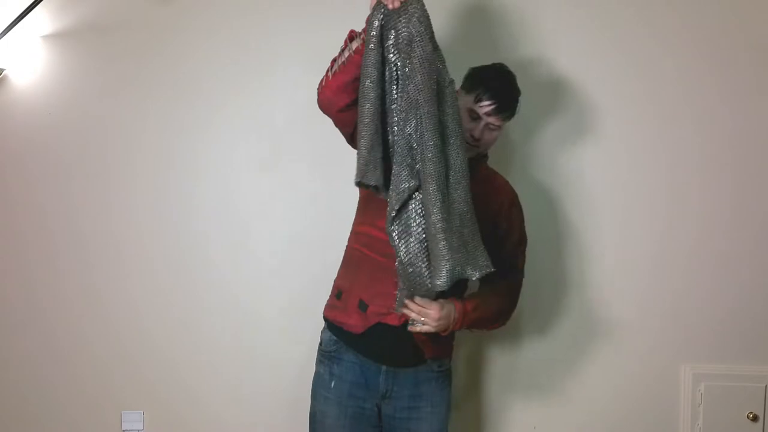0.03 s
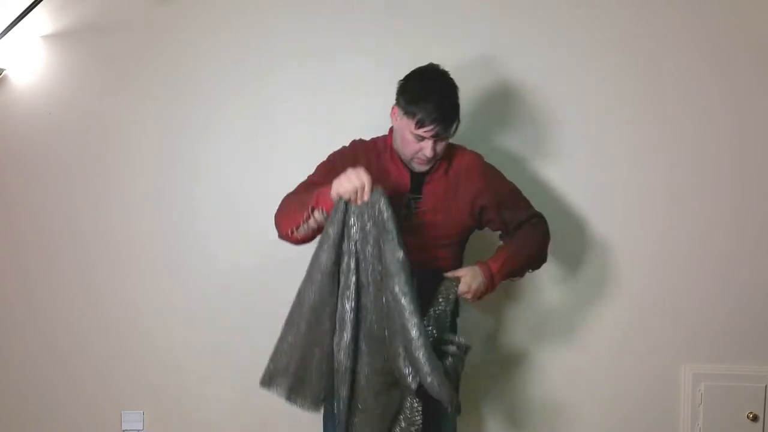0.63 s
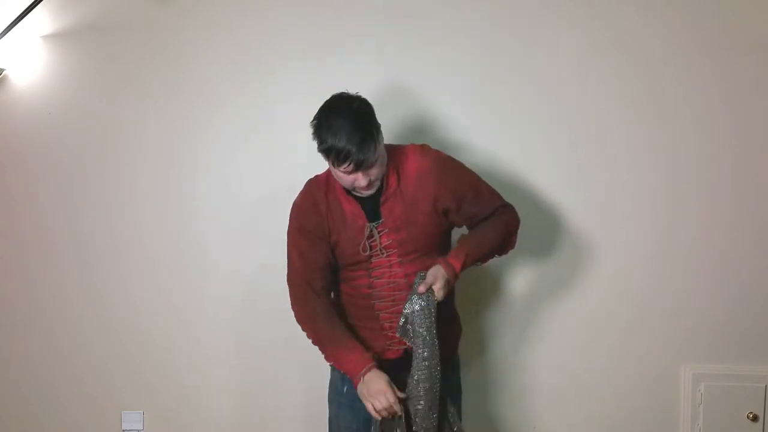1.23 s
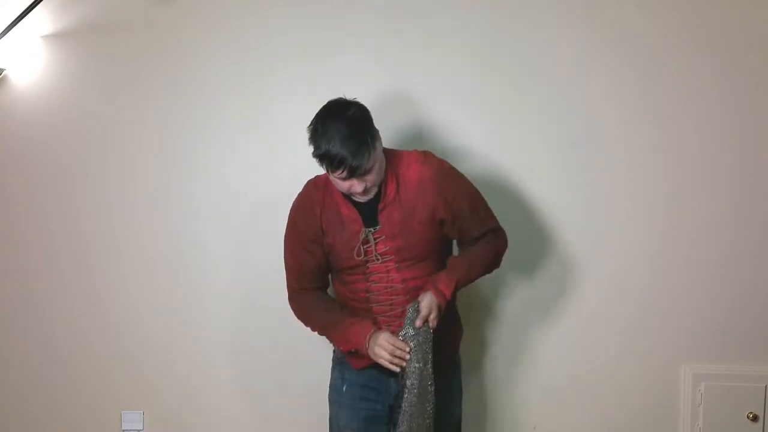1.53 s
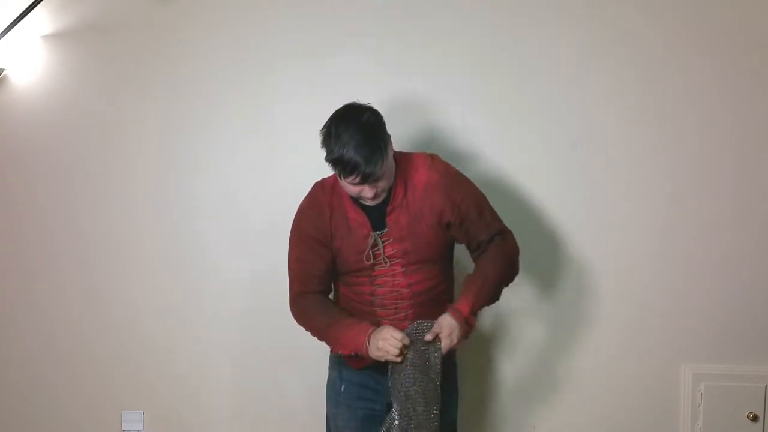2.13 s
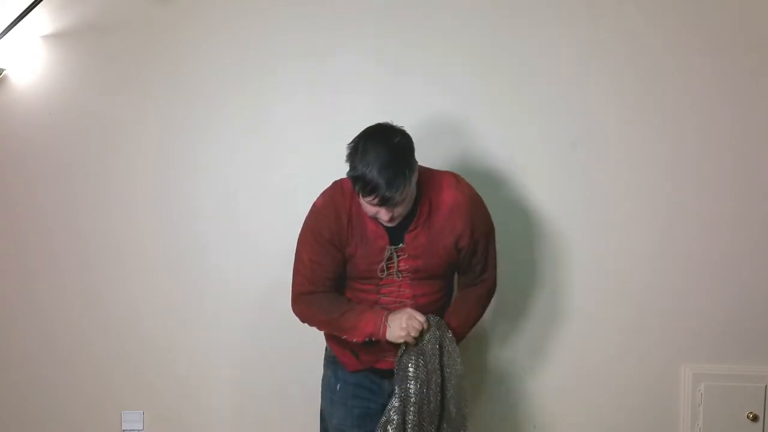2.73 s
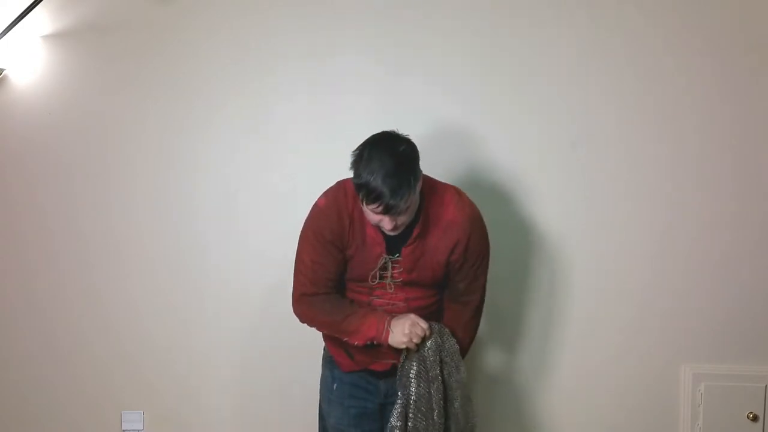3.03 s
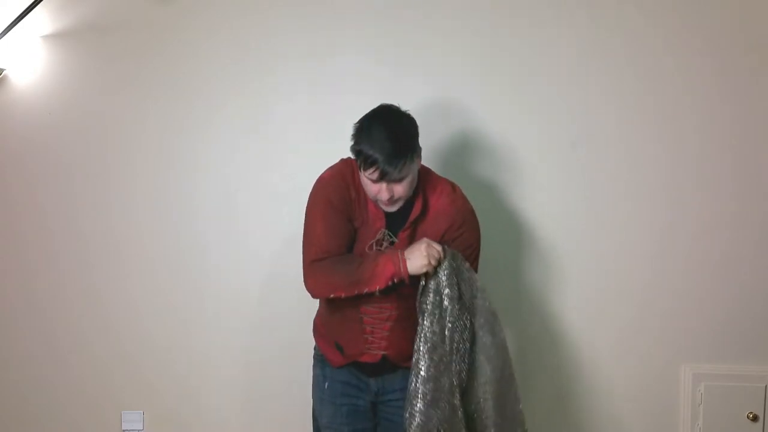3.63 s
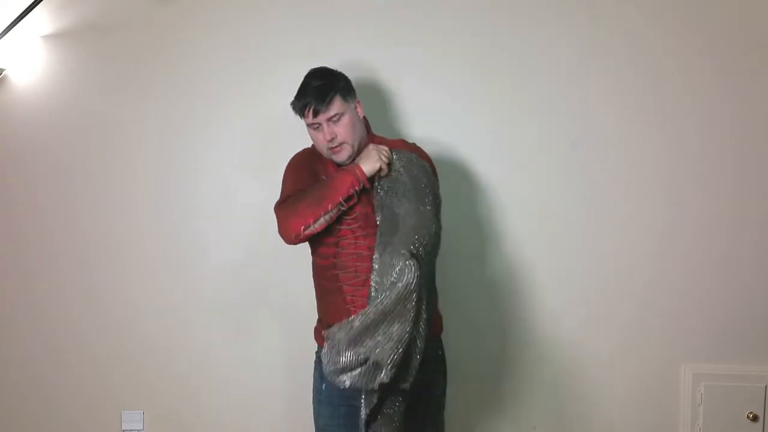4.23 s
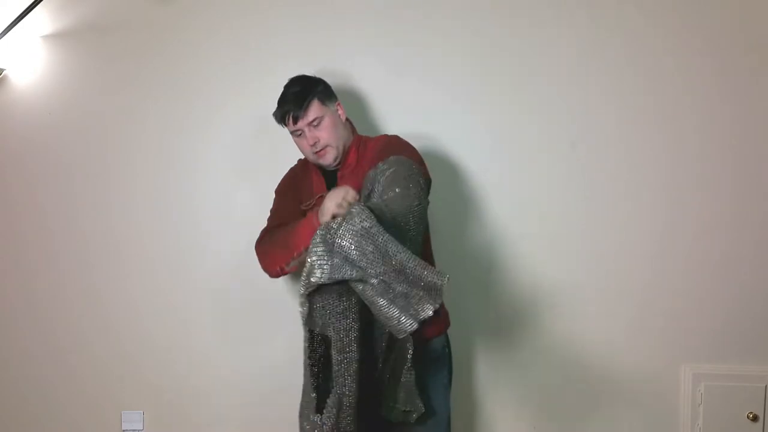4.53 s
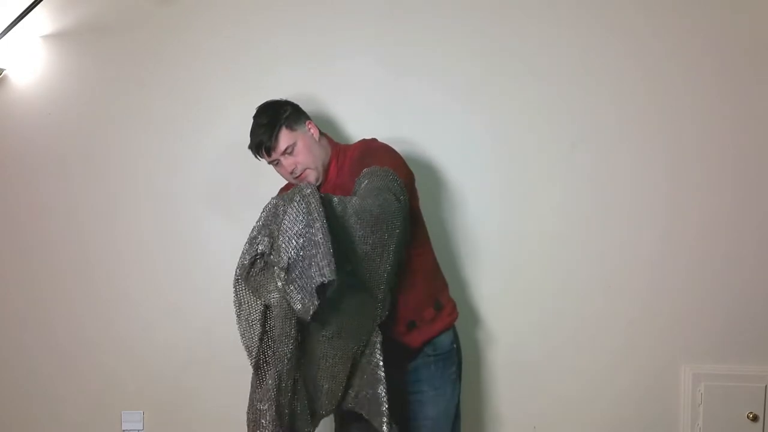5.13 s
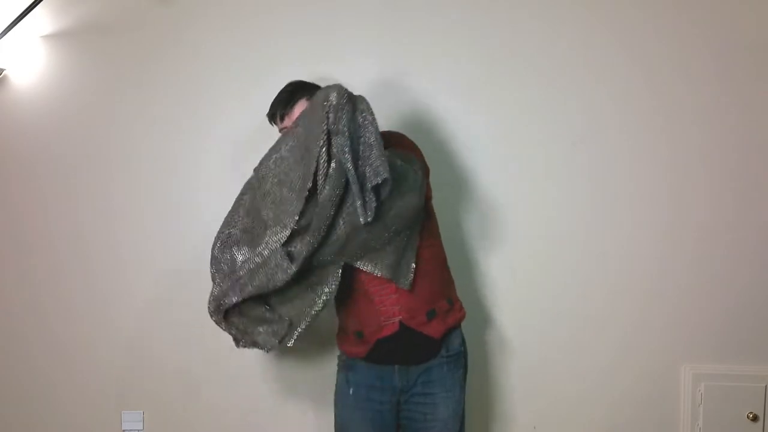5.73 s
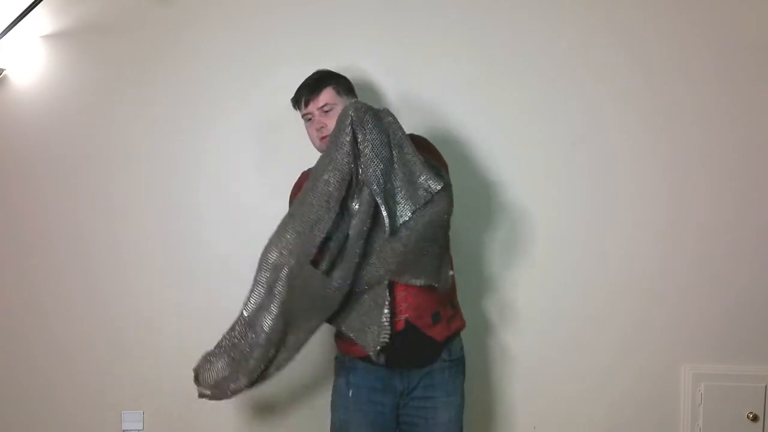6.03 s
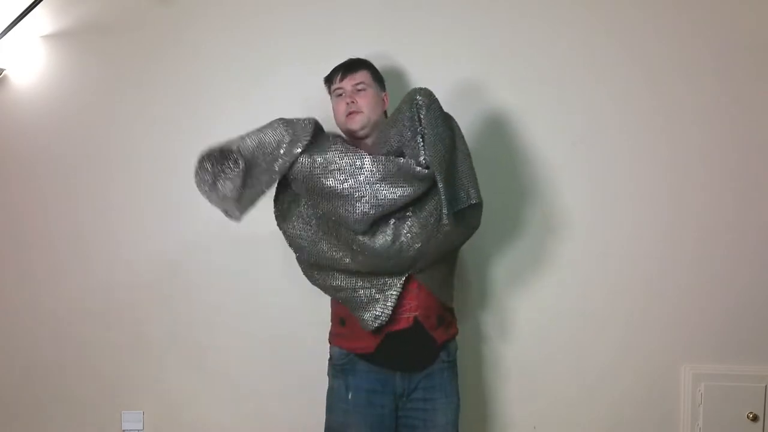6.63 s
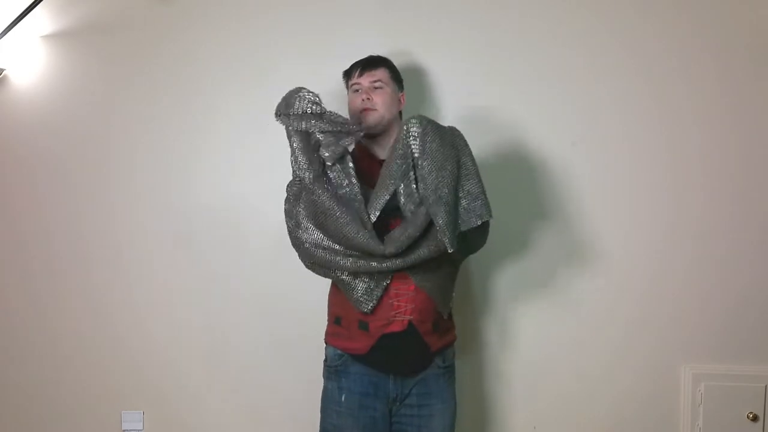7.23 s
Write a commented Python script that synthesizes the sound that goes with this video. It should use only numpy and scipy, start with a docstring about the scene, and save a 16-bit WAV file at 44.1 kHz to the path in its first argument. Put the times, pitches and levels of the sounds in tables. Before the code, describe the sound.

A chain mail shirt is handled in a quiet room, its small steel rings jingling and scraping in bright, uneven surges. Early on, the hem knocks once on the floor. Cloth sleeves rub on the metal and folds tick over through a quieter stretch. Then the jingling returns and grows busier as the shirt is pulled over the arms. The walls add a short echo above a faint rumble and hiss.

```python
"""A chain mail shirt is lowered, gathered and pulled over the arms in a quiet room.
Thousands of small steel rings tick against each other as the weave moves, and scrape where they
carry weight. Once, the hem drops on the floor with a knock. Sleeves rub on the rings and folds snap
over under the fingers. The walls add a short echo, and the room rumbles and hisses faintly."""
import sys
import numpy as np
from scipy import signal
from scipy.fft import rfft, irfft, next_fast_len
from scipy.io import wavfile
from scipy.ndimage import uniform_filter1d

SR = 44100
rng = np.random.default_rng(int(sys.argv[2]) if len(sys.argv) > 2 else 0)


def waveform_to_disk(signal):
    """Save audio, clipped to [-1, 1], as 16-bit WAV at the path in sys.argv[1]."""
    frames = np.transpose(np.atleast_2d(signal))
    scaled = np.clip(frames, -1, 1) * 32767
    samples = np.round(scaled).astype(np.int16)
    wavfile.write(sys.argv[1], SR, samples)


N = 321489
T = np.arange(N) / SR

# Tone curves: how strong each sound is from low to high. Columns: pitch_hz, gain_db
RUMBLE_TONE = [(10, -9), (21, 6.5), (30, -1), (42, -6), (58, -4), (80, -4.5), (105, -3), (150, -8),
               (190, -7.5), (330, -15), (470, -17.5), (650, -23), (1200, -29.5), (2500, -51.5)]
HISS_TONE = [(700, -12), (1300, 1), (1600, 4.5), (2300, -1.5), (5000, -3), (9000, -2), (15500, -10.5)]
JINGLE_TONE = [(1500, -45), (3000, -17), (4500, -7.5), (6000, -7), (7200, -2.5), (8300, -1.5), (10500, -3),
               (13000, -5), (15800, -6)]
SCRAPE_TONE = [(250, -2.5), (600, -4.5), (1200, -5.5), (2400, -2), (3600, 0.5), (5200, 0), (7000, -2.5),
               (11000, -5), (16000, -30)]
HEAP_TONE = [(90, -27), (190, -0.5), (300, 3), (400, 3), (620, -4), (800, -2.5), (1000, 0), (1350, -9),
             (1900, -5.5), (3000, -24), (7000, -28)]
CLOTH_TONE = [(150, -4), (500, 1.5), (800, -3), (1200, -4), (1800, -7), (2800, -11), (6000, -19),
              (14000, -28)]
SNAP_TONE = [(200, -14), (550, 4), (1100, 0), (2200, -1), (4500, -11.5), (8000, -3), (15000, -9)]
# The steady notes of the room's drone. Columns: pitch_hz, width_hz, level_db
DRONE_NOTES = [(68.6, 4.3, -63.5), (267.5, 24, -62.5), (769, 31, -70.5)]
# Each shift of the weave. Columns: fullest_s, level_db, rise_s, settle_s, scrape_offset_db
WEAVE_SHIFTS = [ (.059, -52, 0.096, 0.089, -20), (.209, -49, .045, .06, -19), (.39, -59, .05, .15, -15),
                (.668, -43.5, 0.044, .11, -11.5), (.872, -44, 0.039, 0.11, -11),
                (1.016, -47.5, 0.042, .2, -10.5), (1.33, -51.5, 0.15, 0.2, -11.5),
                (1.46, -46.5, 0.085, 0.15, -15), (1.533, -39, 0.028, 0.031, -2.5),
                (1.582, -36.5, 0.031, 0.043, -7), (1.75, -53, 0.055, 0.12, -15),
                (1.93, -51.5, 0.059, 0.17, -10.5), (2.1, -51, 0.057, 0.086, -4.5),
                (2.27, -55.5, .03, 0.17, -7), (2.482, -47, 0.071, 0.14, -9.5),
                (2.745, -58, .04, 0.091, -16), (2.9, -50, 0.059, 0.092, -16), (3.46, -73, .13, .35, 8),
                (3.724, -61, .015, 0.062, 8.5), (3.794, -64, 0.025, 0.13, 6), (4.032, -52, 0.15, 0.24, -10),
                (4.175, -47, 0.077, 0.33, -10), (4.345, -47, .025, 0.16, -12),
                (4.537, -44, 0.052, 0.15, -12), (4.663, -44.5, 0.045, 0.075, -11.5),
                (4.806, -46.5, 0.047, .06, -14), (5.038, -54, 0.017, .04, -15),
                (5.166, -50, .021, 0.074, -7), (5.25, -52.5, .035, 0.21, -3.5),
                (5.487, -50, 0.067, 0.33, -4.5), (5.638, -43, 0.022, 0.046, -6),
                (5.8, -40.5, 0.042, .09, -10), (5.897, -39, 0.032, 0.12, -9),
                (5.958, -38.5, 0.023, 0.035, -14), (6.073, -45, .08, 0.074, -8.5),
                (6.155, -48.5, 0.044, 0.044, -9), (6.333, -42.5, 0.024, 0.022, -10.5),
                (6.57, -53, 0.12, 0.13, -0.5), (6.662, -39, 0.049, 0.093, -8.5),
                (6.765, -39.5, 0.022, 0.18, -10), (6.924, -41.5, 0.035, 0.11, -10),
                (7.027, -39.5, 0.046, 0.04, -10.5), (7.151, -39.5, 0.029, 0.094, -11),
                (7.25, -45, 0.092, 0.16, -9)]
# The hem lands in a quick cluster of hits. Columns: start_s, level_db
HEM_KNOCKS = [(1.5115, -35), (1.5144, -36.5), (1.5203, -37), (1.5291, -25.5), (1.531, -27.5)]
# The notes that hem and floor ring with. Columns: pitch_hz, level_db, fade_s (time to fall 60 dB)
FLOOR_NOTES = [(940, -12, 0.027), (1030, 2, 0.024), (1150, -24, .024), (2050, -25, .01),
               (3040, -8.5, 0.014), (4240, -6.5, 0.015), (5090, -22, .01)]
# Each stroke of a sleeve on the mail. Columns: fullest_s, level_db, rise_s, settle_s
SLEEVE_STROKES = [(1.9, -58.5, .18, 0.12), (2.07, -56.5, 0.044, .06), (2.125, -54, 0.014, .04),
                  (2.27, -61.5, .03, 0.22), (3.44, -61, 0.14, 0.79), (3.74, -57, 0.033, 0.24),
                  (4.27, -59.5, 0.11, 0.087)]
# Each fold that snaps over. Columns: start_s, peak_db, pitch_hz (middle of a wide band)
FOLD_SNAPS = [(2.029, -36.5, 2300), (2.120, -38, 900), (2.133, -38, 950), (2.141, -47, 600),
              (2.249, -31, 2000), (2.257, -37, 2200), (2.297, -37.5, 1300), (2.335, -43, 900),
              (2.426, -39.5, 1700), (2.493, -41, 1500), (3.150, -44, 900), (3.315, -39, 1400),
              (3.715, -37, 1000), (3.719, -43, 3800), (4.389, -39.5, 750)]


def undb(db):
    """Turn decibels into a number to multiply by."""
    return 10 ** (np.asarray(db) / 20)


def unit(x):
    """Scale a sound to an average power of 1."""
    return x / np.sqrt(np.mean(x ** 2))


def colour(x, tone):
    """Filter a sound so that its lows and highs follow a tone curve."""
    hz, db = np.transpose(tone)
    size = next_fast_len(len(x) + SR // 4)
    size += size % 2
    grid_hz = np.maximum(np.fft.rfftfreq(size, 1 / SR), 1)
    gain = undb(np.interp(np.log(grid_hz), np.log(hz), db))
    # These steps keep the filter from ringing before a hit arrives.
    cepstrum = irfft(np.log(gain))
    cepstrum[1:size // 2] *= 2
    cepstrum[size // 2 + 1:] = 0
    return irfft(rfft(x, size) * np.exp(rfft(cepstrum)))[:len(x)]


def resonate(x, hz, width_hz):
    """Make a sound ring at one pitch; a narrower width rings longer."""
    hz = min(hz, SR / 2 - 1000)
    return signal.lfilter(*signal.iirpeak(hz, hz / min(width_hz, SR / 4), fs=SR), x)


def contacts(per_second, spread_db):
    """Tiny hits at random times: many small and a few large, or all alike if the spread is 0."""
    chance = np.clip(per_second / SR, 1e-5, 1)
    sizes = unit(undb(spread_db * np.minimum(rng.exponential(size=N), 5)))
    return (rng.random(N) < chance) * rng.choice([-1, 1], N) * sizes / np.sqrt(chance)


def wander(per_second):
    """A curve that glides smoothly from one random value to the next."""
    hold = max(int(SR / per_second), 1)
    steps = np.repeat(rng.standard_normal(N // hold + 1), hold)
    return unit(uniform_filter1d(uniform_filter1d(steps, hold), hold)[:N])


def add(out, start_s, sound):
    """Mix a sound in at its start time."""
    i = int(start_s * SR)
    out[i:i + len(sound)] += sound[:N - i]


def swell(fullest_s, level_db, rise_s, settle_s):
    """The loudness of one movement: it builds to its fullest, then dies away."""
    late_s = T - fullest_s
    drop = np.where(late_s < 0, (late_s / rise_s) ** 2, late_s / settle_s)
    return undb(level_db) * np.exp(-np.minimum(drop, 20))


def together(movements, idle_db):
    """Overlapping movements add their power, over a faint constant stir."""
    return np.sqrt(undb(idle_db) ** 2 + sum(swell(*row) ** 2 for row in movements))


def background():
    """The house rumbles low all the time, with a faint drone and an even hiss."""
    rumble = undb(-49.5) * unit(colour(rng.standard_normal(N), RUMBLE_TONE))
    drone = sum(undb(db) * unit(resonate(rng.standard_normal(N), hz, width_hz))
                for hz, width_hz, db in DRONE_NOTES)
    hiss = undb(-57.5) * unit(colour(rng.standard_normal(N), HISS_TONE))
    return rumble + drone + hiss


def ring_jingle(motion, families=36):
    """Each family of rings has its own short ping; faster movement makes more of them collide."""
    hits = contacts(per_second=24000 * (motion / motion.max() + .12), spread_db=0)
    family = rng.integers(0, families, N)
    pitches_hz = np.linspace(4000, 15800, families)
    pings = sum(resonate(hits * (family == k), hz, width_hz=1100) for k, hz in enumerate(pitches_hz))
    return motion * unit(colour(pings, JINGLE_TONE))


def chain_mail():
    """The weave slides in little avalanches: loose rings ping, rings that carry weight scrape."""
    motion = together([row[:4] for row in WEAVE_SHIFTS], idle_db=-74)  # never quite still
    scrapes = [(s, db + offset_db, rise, settle) for s, db, rise, settle, offset_db in WEAVE_SHIFTS]
    load = together(scrapes, idle_db=-73)
    surge = undb(1.33 * wander(per_second=61))
    jingle = ring_jingle(motion)
    catches = contacts(per_second=10000 * (load / load.max() + .1), spread_db=2.5)
    scrape = load * unit(colour(catches, SCRAPE_TONE))
    return surge * (undb(-1.28) * jingle + undb(0.86) * scrape)


def hem_drop():
    """The hem knocks on the floor, and the rings behind it slump into a heap."""
    t = T[:SR // 5]
    knock = sum(undb(db) * np.sin(2 * np.pi * hz * t) * undb(-60 * t / fade_s)
                for hz, db, fade_s in FLOOR_NOTES)
    heap = swell(fullest_s=1.517, level_db=-38, rise_s=0.01, settle_s=0.068)
    out = heap * unit(colour(contacts(per_second=5000, spread_db=3), HEAP_TONE))
    for start_s, level_db in HEM_KNOCKS:
        add(out, start_s, undb(level_db) * knock)
    return out


def sleeve_rub():
    """Cloth catches and slips on the rings in uneven strokes."""
    strokes = together(SLEEVE_STROKES, idle_db=-78.5)
    flutter = undb(1.2 + 2.8 * wander(per_second=32))
    slips = contacts(per_second=2600, spread_db=2.5)
    return strokes * flutter * unit(colour(slips, CLOTH_TONE))


def fold_snaps(crack_s=0.0014, settle_s=0.01, settle_db=-18):
    """A tight fold lets go with a dry tick, and its rings settle."""
    out, t = np.zeros(N), T[:SR // 10]
    fade = np.exp(-t / crack_s) + undb(settle_db) * np.exp(-t / settle_s)
    for start_s, peak_db, pitch_hz in FOLD_SNAPS:
        burst = rng.standard_normal(len(t)) * fade
        tick = colour(resonate(burst, pitch_hz, width_hz=2.1 * pitch_hz), SNAP_TONE)
        add(out, start_s, undb(peak_db) * tick / np.abs(tick).max())
    return out


def room_echo(x, echo_db=-9, low_fade_s=0.28, high_fade_s=0.54, split_hz=3000, patterns=19):
    """Bare walls add a short echo; its pattern changes as the shirt moves about."""
    t, step = T[:SR // 2], N // (patterns - 1)
    lows, highs = (signal.butter(2, split_hz, kind, fs=SR, output="sos") for kind in ("low", "high"))
    echo = np.zeros(N)
    for k in range(patterns):
        low_noise, high_noise = rng.standard_normal((2, len(t))) * (t > .004)  # echo starts 4 ms late
        tail = signal.sosfilt(lows, low_noise) * undb(-60 * t / low_fade_s)
        tail += signal.sosfilt(highs, high_noise) * undb(-60 * t / high_fade_s)
        span = np.arange(max((k - 1) * step, 0), min((k + 1) * step, N))
        blend = np.cos(np.pi / 2 * (span / step - k))  # each pattern fades into the next
        add(echo, span[0] / SR, signal.fftconvolve(x[span] * blend, tail / np.linalg.norm(tail)))
    return x + undb(echo_db) * echo


def scene():
    """The shirt and the room together, the same in both channels."""
    handling = chain_mail() + hem_drop() + sleeve_rub() + fold_snaps()
    mono = room_echo(handling) + background()
    return np.array([mono, mono])


def record(dry, top_hz=15700, offset=.0162):
    """Cut the very highest treble and lift the whole wave slightly off zero."""
    treble_cut = signal.ellip(12, .1, 70, top_hz, fs=SR, output="sos")
    return signal.sosfilt(treble_cut, dry) + offset


dry = scene()
out = record(dry)
waveform_to_disk(out)
```